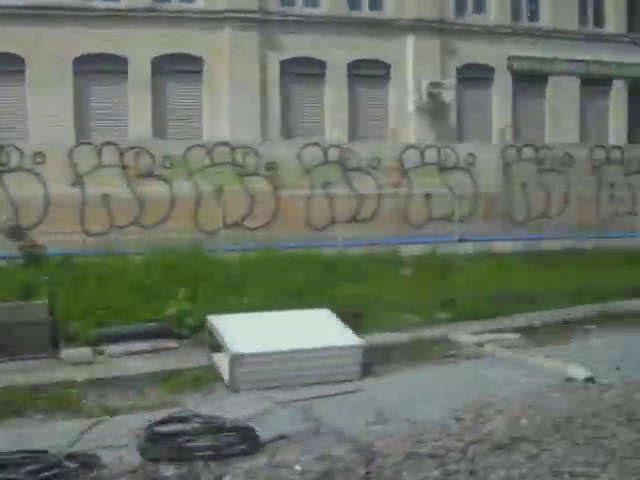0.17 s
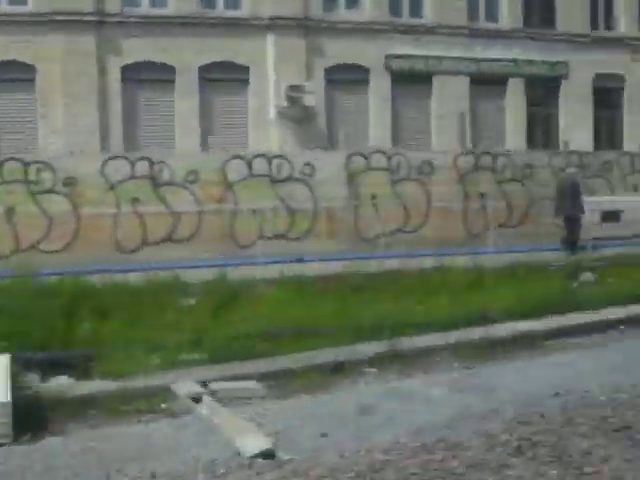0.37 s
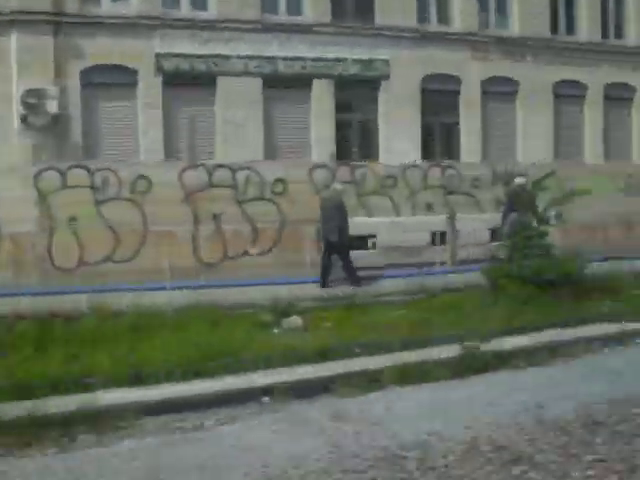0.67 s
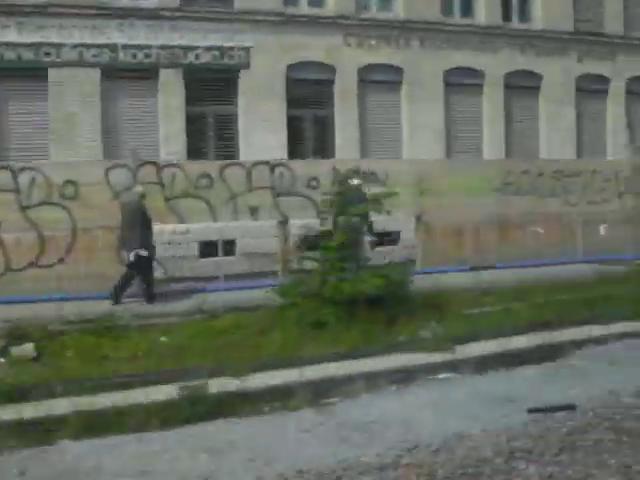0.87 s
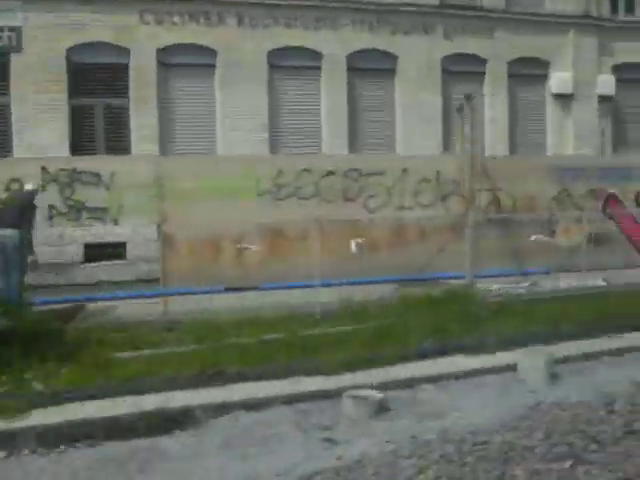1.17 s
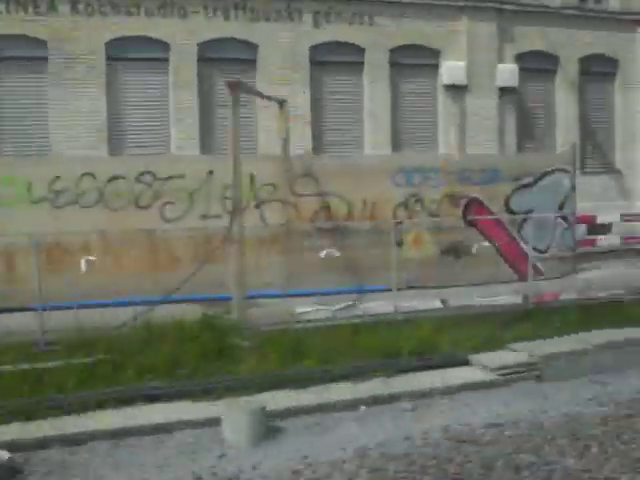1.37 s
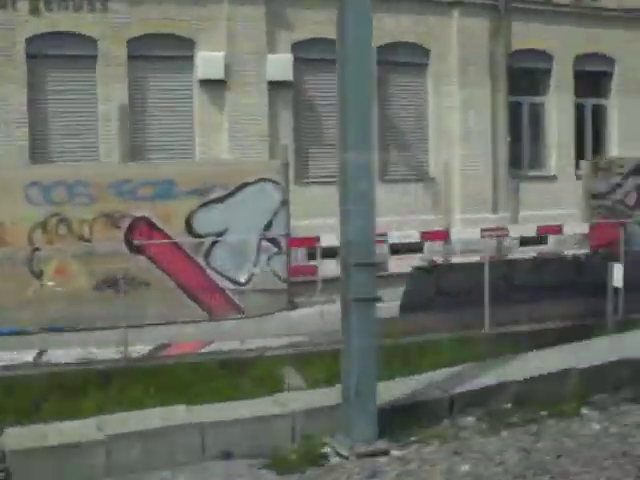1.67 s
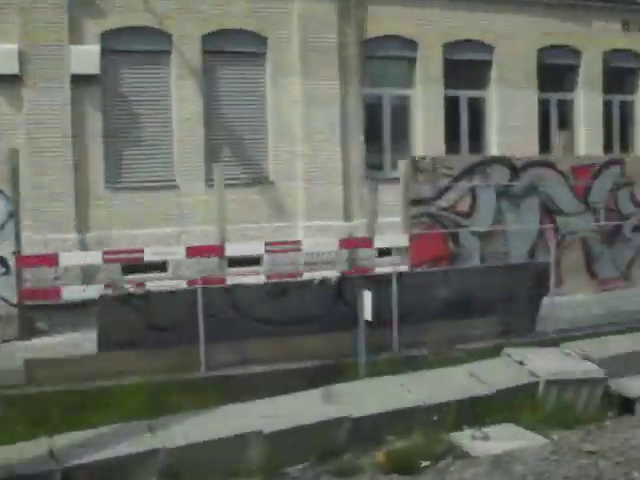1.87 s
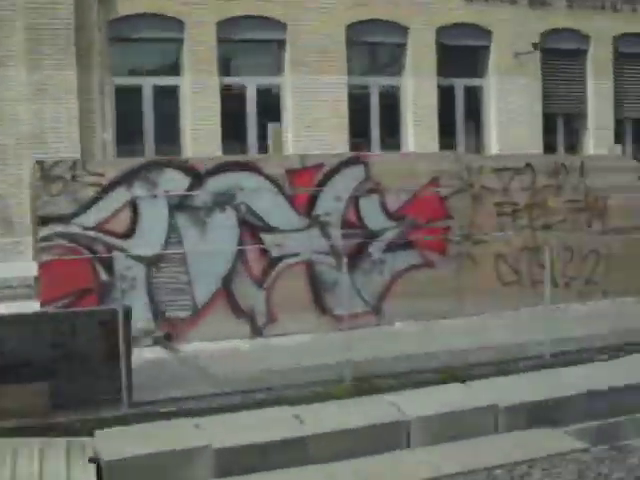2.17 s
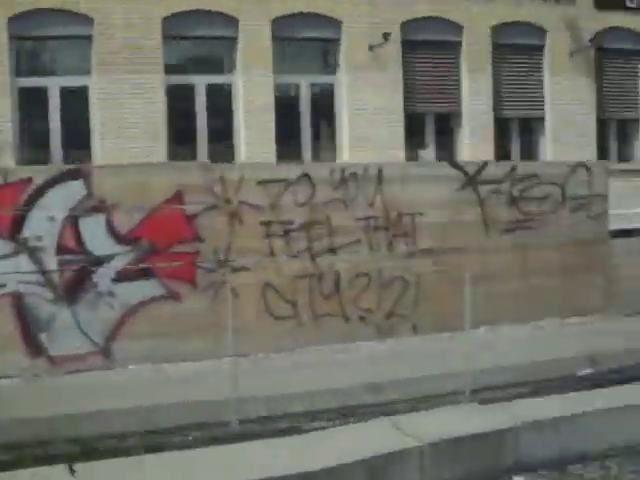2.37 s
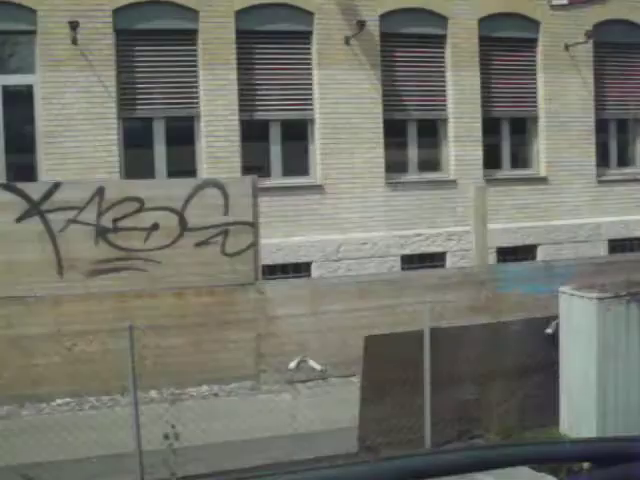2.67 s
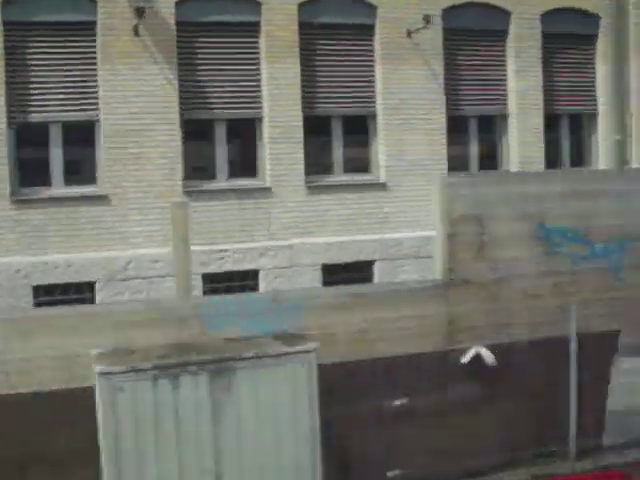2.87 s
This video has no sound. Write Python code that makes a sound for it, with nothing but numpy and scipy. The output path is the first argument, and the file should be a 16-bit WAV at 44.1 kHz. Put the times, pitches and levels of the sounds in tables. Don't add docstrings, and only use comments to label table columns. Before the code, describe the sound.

Train wheels rumble inside a hollow carriage, with hard thuds and clattering clacks at rail joints

```python
import sys
import numpy as np
from scipy import signal
from scipy.fft import rfft, irfft, next_fast_len
from scipy.io import wavfile
from scipy.ndimage import uniform_filter1d, map_coordinates

SR = 44100
rng = np.random.default_rng(int(sys.argv[2]) if len(sys.argv) > 2 else 0)


def undo_db(level):
    steps = np.asarray(level, float) / 20
    return 10 ** steps


def master(y):
    cut = np.clip(np.atleast_2d(y).T, -1, 1)
    pcm = np.round(cut * 32767)
    wavfile.write(sys.argv[1], SR, pcm.astype(np.int16))


N = 133182


def unit(x):
    return x / np.sqrt(np.mean(x ** 2) + 1e-20)


def filtered(x, response):
    size = next_fast_len(x.shape[-1] + 8192)
    hz = np.fft.rfftfreq(size, 1 / SR)
    return irfft(rfft(x, size) * response(hz), size)[..., :x.shape[-1]]


def colour(points):
    point_hz, db = np.transpose(points)
    return lambda f: undo_db(np.interp(np.log(f + 1), np.log(point_hz + 1), db))


def ring(f, hz, width):
    return 1j * f * width / (hz * hz - f * f + 1j * f * width)


def modes(table):
    return lambda f: sum((-1) ** k * undo_db(db) * ring(f, hz, width)
                         for k, (hz, width, db) in enumerate(table))


def curve(points):
    return np.interp(np.arange(N) / SR, *np.transpose(points))


def wobble(rate):
    knots = rng.standard_normal(int(N * rate / SR) + 4)
    return map_coordinates(knots, [np.arange(N) * rate / SR])


def patchy(depth_db):
    z = signal.stft(rng.standard_normal(N + 512), nperseg=512)[2]
    field = uniform_filter1d(rng.standard_normal(z.shape), size=4, axis=0)
    field = uniform_filter1d(field, size=8, axis=1)
    return signal.istft(z * undo_db(depth_db * unit(field)), nperseg=512)[1][:N]


def add(track, start_s, sound):
    part = track[round(start_s * SR):][:len(sound)]
    part += sound[:len(part)]


# (time [s], level [dB])
ROLL = [(0, -24), (.07, -27), (.12, -33.5), (.19, -29), (.25, -24.5), (.42, -22), (.5, -27.5), (.56, -24.5),
        (.62, -27), (.68, -29), (1.15, -31.5), (1.22, -29), (1.5, -32), (1.7, -30), (2.0, -32.5),
        (2.55, -30.5), (2.9, -29.5), (3.02, -25.5)]


def rolling_strength():
    return curve(ROLL)


# (frequency [Hz], level [dB per Hz])
AIR = [(760, -30), (1300, -8.5), (1410, -20.5), (1610, -8), (2390, -13), (2620, -11.5), (3250, -15.5),
       (3980, -20), (5170, -66), (8760, -120)]


def air(roll_db):
    level_db, follows = -47.5, 0.085
    swell_db = follows * (roll_db - roll_db.mean())
    return undo_db(level_db + swell_db) * unit(filtered(patchy(1.4), colour(AIR)))


# (frequency [Hz], level [dB per Hz])
HEAVE = [(8, -43.5), (20, -9), (40, -3), (58, -1.5), (70, -3.5), (95, -30), (200, -71.5)]
# (time [s], level [dB])
SWAY = [(0, -29.5), (.25, -29.5), (.5, -28.5), (.6, -33.5), (.85, -32.5), (1.3, -32.5), (1.42, -21.5),
        (1.5, -31.5), (2.1, -34), (2.4, -29.5), (2.55, -34), (2.88, -25), (3.02, -37)]


def heave():
    bass = unit(filtered(rng.standard_normal(N), colour(HEAVE)))
    return undo_db(curve(SWAY) + 0.61 * wobble(8)) * bass


# (frequency [Hz], level [dB per Hz])
BODY = [(45, -33), (80, -4), (130, -1), (190, -5.5), (300, -6), (520, -8.5), (1250, -16), (2200, -50.5)]
# (frequency [Hz], width [Hz], lift [dB])
CABIN = [(241, 25, 8.5), (421.5, 30, 6), (1200, 380, 0.5)]


def roar(roll_db):
    bump_rate, bump_spread_db, bump_db = 150, 1, -9.5
    deep_hz, deep_follows = 181, 0.81
    draw = rng.random((3, N))
    happens = draw[0] < bump_rate / SR
    bumps = happens * np.sign(draw[1] - .5) * undo_db(2 * bump_spread_db * draw[2])

    def cabin(f):
        lifts = [1 + (undo_db(db) - 1) * ring(f, hz, width) for hz, width, db in CABIN]
        return colour(BODY)(f) * np.prod(lifts, axis=0)

    sound = unit(filtered(patchy(2.1) + undo_db(bump_db) * unit(bumps), cabin))
    deep = filtered(sound, lambda f: 1 / (1 + (f / deep_hz) ** 8))
    deep_change = undo_db((deep_follows - 1) * (roll_db - roll_db.mean())) - 1
    return undo_db(roll_db + 2.0 + 0.44 * wobble(9.71)) * (sound + deep * deep_change)


# (time [s], length [s], level [dB], pitch [Hz])
SQUEAKS = [
    (1.79, 0.057, -41, 1180),
    (2.04, .02, -47, 1370),
    (2.064, .025, -34, 1200),
    (2.96, 0.06, -44, 1500),
]


def squeaks():
    out = np.zeros(N)
    t = np.arange(-SR // 10, SR // 10) / SR
    for s, length, db, hz in SQUEAKS:
        tone = unit(filtered(rng.standard_normal(len(t)), lambda f: ring(f, hz, 60) ** 2))
        add(out, s - .1, undo_db(db) * tone * np.exp(-2 * (t / length) ** 2))
    return out


# (time [s], peak level [dB])
TICKS = [
    (.905, -35),
    (.912, -35),
    (.930, -29),
    (2.752, -22),
]


def ticks():
    hz, width_hz, t60_s = 3150, 1400, 0.0091
    out, t = np.zeros(N), np.arange(SR // 20) / SR
    for s, db in TICKS:
        burst = rng.standard_normal(len(t)) * undo_db(-60 * t / t60_s)
        hit = filtered(burst, lambda f: ring(f, hz, width_hz) ** 2)
        add(out, s, undo_db(db) * hit / np.abs(hit).max())
    return out


# (time [s], peak level [dB], pitch [Hz], time to fall 60 dB [s])
THUDS = [(.048, -16.5, 56.1, 0.29), (.259, -11, 242.5, .1), (.34, -9.5, 244, .08), (0.39, -11, 330, 0.025),
         (.408, -9.5, 450, .06), (1.184, -21, 443, 0.2), (1.372, -5.5, 210, 0.064),
         (1.7903, -19.5, 37.5, 0.48), (1.8778, -15, 44.2, 0.099), (2.216, -3, 139, 0.059),
         (2.2205, -10, 330, .05), (2.229, -2.5, 106, 0.039), (2.325, -12, 46.3, 0.3),
         (2.29, -20.5, 120, 0.55), (2.383, -12, 275.5, 0.075), (2.392, -4, 408.5, 0.034),
         (2.4522, -7.5, 246, .04), (2.8172, -6.5, 237, 0.1), (2.8393, -6, 148.7, .06),
         (2.391, -21, 1280, 0.033), (2.465, -20, 1340, .035), (2.418, -12, 760, 0.05),
         (2.779, -16.5, 858, 0.042), (2.404, -16, 420, 0.11), (2.219, -12, 210, 0.057),
         (.445, -15, 520, .15), (1.185, -27, 1250, 0.068), (3.1, -15, 220, 0.024), (2.977, -18.5, 400, .1)]


def thuds():
    rise_cycles, grit_share = 0.99, 0.26
    out, t = np.zeros(N), np.arange(SR // 3) / SR
    for s, db, hz, t60 in THUDS:
        def rough(f):
            return ring(f, 1.4 * hz, 1.3 * hz) ** 3 / (1 + (f / 1400) ** 4)

        grit = unit(filtered(rng.standard_normal(len(t)), rough))
        shape = (1 - np.exp(-t * hz / rise_cycles)) * undo_db(db + 1 - 60 * t / t60)
        add(out, s, shape * (grit_share * grit - np.sin(2 * np.pi * hz * t)))
    return out


# (time [s], peak level [dB], time to fall 60 dB [s], dull share [0-1])
CLACKS = [(0.049, -26.5, .05, .97), (.26, -27, 0.038, 0.95), (.6, -25.5, 0.094, .97),
          (.845, -27.5, 0.037, 1), (1.179, -21.5, 0.14, 1), (2.220, -22, 0.03, 0.97),
          (2.316, -22, .06, .45), (2.405, -12.5, 0.066, 0.3), (2.4098, -4, 0.037, 0.23),
          (2.4118, -6, .025, .1), (2.4155, -9, .11, .6), (2.465, -18.5, 0.06, 0.7), (2.736, -13, .035, 0.3),
          (2.745, -16, 0.083, .3), (2.77, -16, 0.074, .9), (2.779, -16.5, 0.11, 0.47),
          (2.796, -27.5, 0.18, 0), (2.818, -18, 0.1, .9), (2.839, -20, .04, 0.3), (2.847, -11, .04, .35),
          (2.853, -14, .06, .85), (2.952, -29.5, .05, .8)]
# (frequency [Hz], width [Hz], level [dB])
STEEL = [(1732, 170, -3.5), (2042, 27, -11.5), (2373, 150, -2), (2966, 360, -0.5), (3389, 630, -11.5)]
# (frequency [Hz], width [Hz], level [dB])
PANEL = [(392, 98, -7), (746, 200, -5), (1200, 120, -8), (1405, 63, -5)]


def panel_response(f):
    ratio = f / 1670
    return modes(PANEL)(f) / (1 + 1j * ratio - ratio ** 2) ** 2


def clacks():
    rise_s, strike = 0.0011, 7.0
    out, t = np.zeros(N), np.arange(SR // 5) / SR
    for s, db, t60, dull in CLACKS:
        burst = rng.standard_normal(len(t)) * (1 - np.exp(-t / rise_s)) * undo_db(-60 * t / t60)
        burst[0] += strike
        steel = unit(filtered(burst, modes(STEEL)))
        panel = unit(filtered(burst, panel_response))
        hit = (1 - dull) ** 2 * steel + dull * panel
        add(out, s, undo_db(db) * hit / np.abs(hit).max())
    return out


def scene():
    roll_db = rolling_strength()
    background = air(roll_db) + heave() + roar(roll_db)
    return (background + squeaks() + ticks() + thuds() + clacks())[None]


def roll_off(x):
    return signal.sosfilt(signal.butter(12, 15900, fs=SR, output="sos"), x)


def record(dry):
    top_hz, top_order, edge_hz = 3594, 5.2, 4520
    offset, clip_share = .0059, .92

    def camera(f):
        edge = np.clip((edge_hz - f) / 300, 0, 1)
        return edge / np.sqrt(1 + (f / top_hz) ** (2 * top_order))

    x = filtered(dry, camera) + offset
    limit = clip_share * np.abs(x).max()
    x = np.clip(x, -limit, limit)
    x = x * np.minimum(1, np.arange(N) / 200)
    return roll_off(x)


dry = scene()
out = record(dry)
master(out)
```